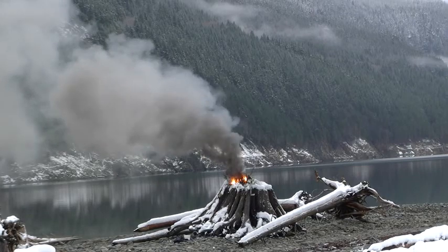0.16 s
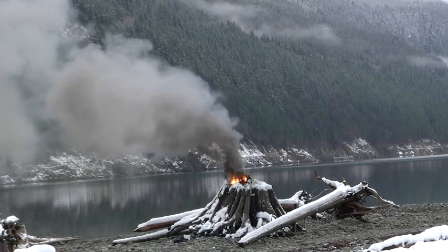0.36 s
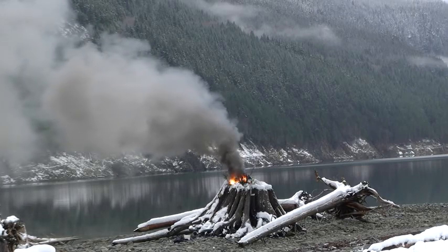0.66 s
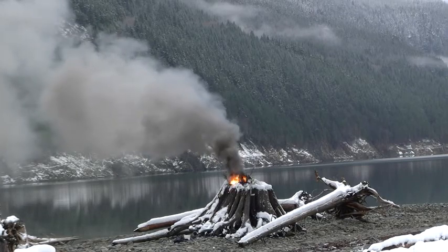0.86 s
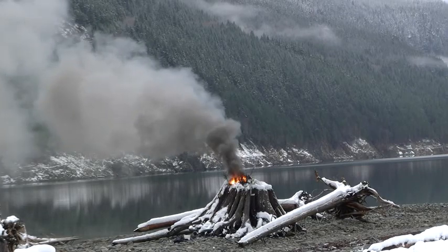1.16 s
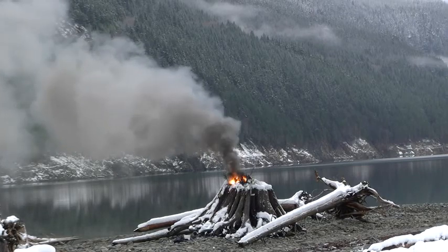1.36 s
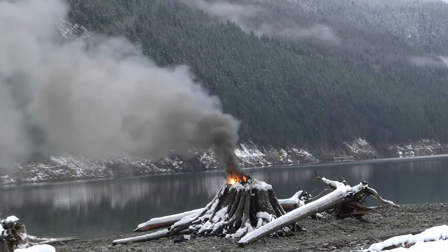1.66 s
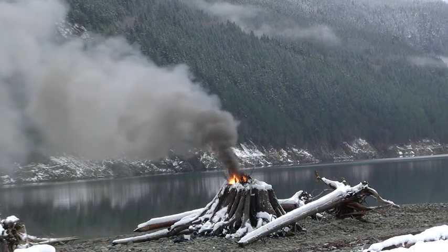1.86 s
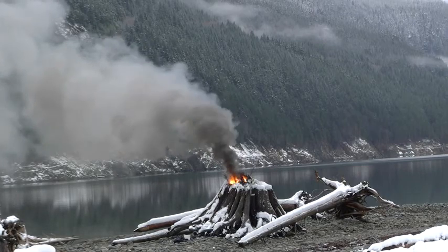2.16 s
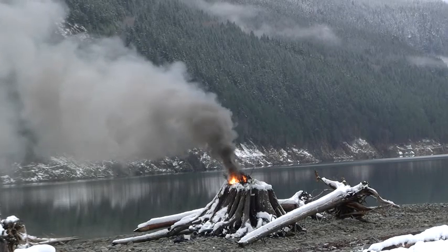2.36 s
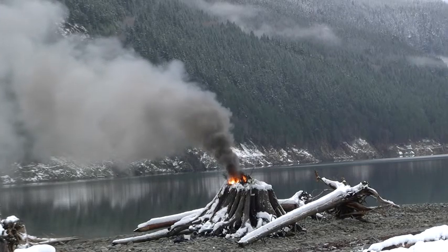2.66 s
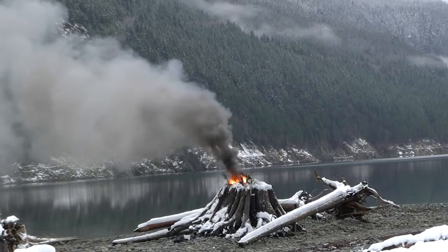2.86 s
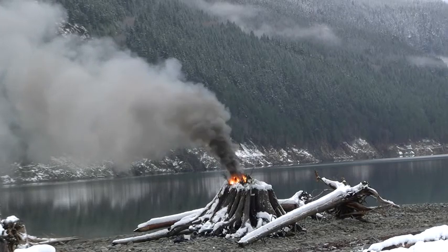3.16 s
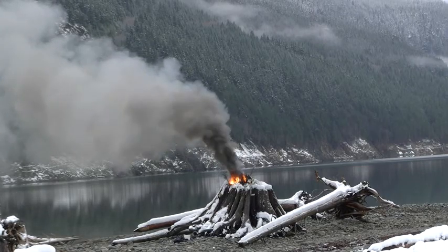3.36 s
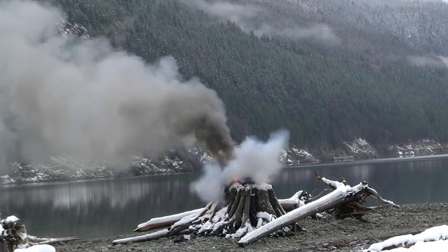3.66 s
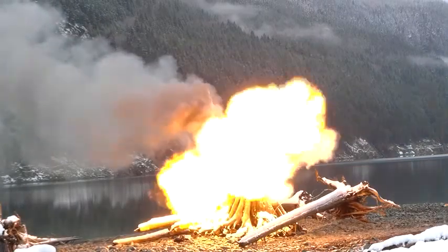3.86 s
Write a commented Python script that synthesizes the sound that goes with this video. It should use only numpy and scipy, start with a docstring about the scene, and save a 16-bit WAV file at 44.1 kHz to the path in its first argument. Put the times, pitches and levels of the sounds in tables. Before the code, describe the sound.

A sudden loud explosion with a short echo interrupts faint fire crackle and distant wind.

```python
"""On the shore of a mountain lake, a stereo microphone faces a burning tree stump. The wood hisses and
pops over the steady rush of the valley, and soft puffs of wind touch the microphone. Then a charge
in the stump goes off with a bright crack and a short roar; the crack's reflection off the ground follows
hard behind. The shock front overloads the microphone, splinters fly, and the fireball swells with a
deep rumble while the shore and the slopes farther off throw the bang back."""
import sys
import numpy as np
from scipy import signal
from scipy.fft import rfft, irfft
from scipy.io import wavfile
from scipy.ndimage import uniform_filter1d

SR = 44100
rng = np.random.default_rng(int(sys.argv[2]) if len(sys.argv) > 2 else 0)


def int16_out(signal):
    """Quantize to a 16-bit WAV file."""
    q = np.round(np.clip(np.atleast_2d(signal).T, -1, 1) * 32767)
    wavfile.write(sys.argv[1], SR, q.astype(np.int16))


N = 176400
T = np.arange(N) / SR

# Microphone resonances struck by the shock. Each row: pitch in Hz, level in dB, decay in seconds.
MIC_MODES = [(1600, 8.5, .00065), (2500, 11, .00058), (6800, 2, .0005)]

# Bursts of noise at the microphone.
# Each row: start in seconds, level in dB, then attack, hold and decay in seconds.
CRACK_BURSTS = [(3.7688, -20, .0004, .013, .009), (3.7868, -16, .0006, .003, .004)]
SPLINTER_BURSTS = [(3.7688, -17, .0002, .001, .002), (3.7866, -17, .0004, .0018, .0016),
                   (3.79, -43.5, .005, .03, .4)]
RUMBLE_BURSTS = [(3.81, -31, .01, .18, .1), (3.894, -19, .013, .058, .011)]
SHORE_BURSTS = [(3.795, -31.5, .004, .012, .033), (3.835, -28.3, .008, .025, .105),
                (3.90, -33.5, .01, .035, .015)]
PUFF_BURSTS = [(.66, -62, .02, .02, .03), (.725, -54, .015, .02, .015), (1.225, -57, .015, .015, .02),
               (2.90, -64, .015, .02, .02)]
ROAR_BURST = (3.7745, -13, .001, .018, .008)
THUMP_BURST = (3.791, -15, .003, .008, .0075)
SLOPE_BURST = (3.981, -28.8, .012, .03, .1)

# The rise and fall of the fire's sizzle. Each row: time in seconds, gain in dB.
FIRE_GAIN = [(0, -63), (.19, -61), (.27, -64.5), (.8, -63.7), (.9, -60.7), (.95, -64.5), (1.4, -62.5),
             (1.6, -63.7), (1.72, -60.7), (2.0, -60.5), (2.38, -59.7), (2.5, -61.7), (2.68, -60.5),
             (2.8, -62.3), (3.0, -61.6), (3.3, -63.5), (3.56, -62.8), (3.72, -64.5)]
# Louder pops of the burning wood. Each row: start in seconds, level in dB, pitch in Hz.
WOOD_POPS = [(.7385, -45, 8000), (1.0985, -48, 3200), (1.383, -48.5, 5000), (1.6645, -50, 4200),
             (1.734, -50, 6500), (2.0045, -49, 3800), (2.3795, -42.3, 4700), (2.7145, -48, 6500),
             (2.858, -46.8, 6400), (2.988, -51, 5000), (3.7378, -50, 4200)]

# The colour of each source at the microphone. Each row: frequency in Hz, relative density in dB.
CRACK_COLOUR = [(100, -8), (300, -6), (700, -7), (1400, 0), (2000, -2), (2500, -2), (3200, -5),
                (4300, -4.5), (6000, -5), (7500, -10), (10500, -11.5), (15000, -20)]
SPLINTER_COLOUR = [(1000, -14), (3000, -2), (4200, 1), (6000, 1), (8000, -3), (10500, -4), (15000, -15)]
ROAR_COLOUR = [(25, -19), (60, -6), (110, -3), (170, 0), (240, 2.5), (295, -5), (355, 3.5), (480, -12),
               (660, -4.5), (900, -9.5), (1300, -8.5), (2500, -23), (6000, -39), (15000, -56)]
THUMP_COLOUR = [(25, -11), (60, -1), (110, 0), (170, 1), (240, -4), (330, -15), (800, -35), (2000, -60)]
RUMBLE_COLOUR = [(20, -18), (35, -6), (52, -5), (72, 1.5), (98, -7), (140, -1.5), (175, -7), (240, -16),
                 (320, -29), (1000, -55), (4000, -85)]
SHORE_COLOUR = [(80, -10), (250, 3), (420, -3), (700, -1.5), (1300, -1.5), (2500, -3.5), (4000, -8.5),
                (7000, -16), (10500, -20.5), (15000, -35)]
SLOPE_COLOUR = [(100, -10), (330, 0), (700, -3), (1300, -7), (3000, -20), (10000, -36)]
FIRE_COLOUR = [(1000, -14), (2500, -1), (3900, 1), (4800, -5), (5800, 1), (7000, -.5), (8000, -4),
               (9500, -3), (12500, -8), (15500, -15)]
PUFF_COLOUR = [(20, -8), (50, 0), (85, -4), (140, -18), (400, -45), (2000, -80)]
VALLEY_COLOUR = [(20, -25), (45, -12), (65, -9), (160, -7.5), (250, -2.5), (450, -.3), (700, -1),
                 (1400, -4.3), (2050, -10), (3000, -15), (4100, -20), (4800, -26), (8000, -30.5),
                 (15000, -38.5)]

# Stereo images of the blast and of the lakeside ambience, both leaning right.
# Each row: frequency in Hz, correlation of the channels, left minus right in dB.
BLAST_STEREO = [(60, .95, -8.5), (170, .9, -9), (380, .68, -5), (700, .6, -3.7), (1400, .55, -2.7),
                (3100, .5, -1.2), (6800, .1, -.7), (15000, -.25, -.7)]
AMBIENT_STEREO = [(60, -.15, -2.5), (130, -.05, -3.5), (300, .58, -3.5), (640, .63, -2), (1400, .52, -2),
                  (3100, .5, -1.5), (6800, .37, -1.8), (15000, .15, -1.5)]


def shock_front(arrival_s=3.7687, right_lag_s=.00005):
    """The shock front rings the microphone far past full scale, left side first."""
    age = np.maximum(T - arrival_s - np.array([[0], [right_lag_s]]), 0)
    return -sum(undb(db) * np.sin(2 * np.pi * hz * age) * np.exp(-np.minimum(age / decay, 20))
                for hz, db, decay in MIC_MODES)


def crack_and_reflection():
    """The charge goes off with a bright crack; its reflection off the ground follows hard behind."""
    return sum(burst(CRACK_COLOUR, BLAST_STEREO, *row) for row in CRACK_BURSTS)


def splinters(grains_per_s=500, grit_db=2.5):
    """Splinters thrown from the stump, heard as gritty spits and a fading spray."""
    grit = unit(undb(grit_db * flicker(grains_per_s)))
    return grit * sum(burst(SPLINTER_COLOUR, BLAST_STEREO, *row) for row in SPLINTER_BURSTS)


def gas_roar(ceiling=.55):
    """Escaping gas roars and ends in a thump, the pressure peaks softly flattened."""
    roar = burst(ROAR_COLOUR, BLAST_STEREO, *ROAR_BURST)
    thump = burst(THUMP_COLOUR, BLAST_STEREO, *THUMP_BURST)
    return ceiling * np.tanh((roar + thump) / ceiling)


def fireball():
    """The swelling fireball sends a deep rumble to the microphone."""
    return sum(burst(RUMBLE_COLOUR, BLAST_STEREO, *row) for row in RUMBLE_BURSTS)


def echoes():
    """The shore scatters the bang back first; the slopes farther off answer later and duller."""
    shore = sum(burst(SHORE_COLOUR, BLAST_STEREO, *row) for row in SHORE_BURSTS)
    return shore + burst(SLOPE_COLOUR, BLAST_STEREO, *SLOPE_BURST)


def fire_sizzle(crackles_per_s=90, spread_db=3.2, decay_s=.0014):
    """The burning stump gives off a wavering hiss, sprinkled with tiny crackles."""
    onsets = rng.random(N) < crackles_per_s / SR
    sparks = onsets * undb(spread_db * np.clip(rng.standard_normal(N), -2, 2))
    tails = signal.lfilter([1], [1, -np.exp(-1 / (decay_s * SR))], sparks + 1e-18)
    crackle = undb(-5) * unit(tails)
    bright_noise = noise(FIRE_COLOUR, AMBIENT_STEREO)
    hiss = undb(.2 + flicker(20))  # wavers by about 1 dB
    strength = undb(np.interp(T, *np.array(FIRE_GAIN).T))
    return strength * bright_noise * np.hypot(crackle, hiss)  # the two envelopes add in power


def wood_pops():
    """The burning wood pops: ticks of noise that fall away on both sides of their pitch."""
    pops = np.zeros((2, N))
    for start, db, hz in WOOD_POPS:
        colour = [(hz / 4, -9), (hz, 0), (hz * 4, -26)]
        pops += burst(colour, AMBIENT_STEREO, start, db, attack=.0002, hold=.0008, decay=.0014)
    return pops


def wind_puffs():
    """Soft, low puffs of wind right on the microphone."""
    return sum(burst(PUFF_COLOUR, AMBIENT_STEREO, *row) for row in PUFF_BURSTS)


def valley_rush(level_db=-45.3, flicker_db=.4):
    """Distant wind and water fill the valley with an even rush."""
    return noise(VALLEY_COLOUR, AMBIENT_STEREO) * undb(level_db + flicker_db * flicker(10))


def undb(db):
    """Decibels to gain."""
    return 10 ** (np.asarray(db) / 20)


def unit(x):
    """Scale to rms 1."""
    return x / np.sqrt(np.mean(x ** 2))


def flicker(per_s):
    """Random steps, per_s of them a second, smoothed twice and scaled to rms 1."""
    width = int(SR / per_s)
    steps = np.repeat(rng.standard_normal(N // width + 1), width)
    return unit(uniform_filter1d(uniform_filter1d(steps, width), width)[:N])


def noise(colour, stereo, size=N):
    """Noise of rms 1 with the given colour and stereo image."""
    log_hz = np.log(np.maximum(np.fft.rfftfreq(size, 1 / SR), 1))

    def curves(table):
        hz, *columns = np.array(table).T
        return [np.interp(log_hz, np.log(hz), column) for column in columns]

    db, = curves(colour)
    correlation, balance_db = curves(stereo)
    mid, side = rfft(rng.standard_normal((2, size)))
    sign = np.array([[1], [-1]])  # left, right
    spectrum = mid * np.sqrt(1 + correlation) + sign * side * np.sqrt(1 - correlation)
    return unit(irfft(spectrum * undb(db + sign * balance_db / 2), size))


def burst(colour, stereo, start, db, attack, hold, decay):
    """Noise that rises, holds at the given level and dies away; times in seconds."""
    size = 16384
    age = np.arange(size) / SR
    envelope = np.clip(age / attack, 0, 1) * np.exp(-np.clip((age - attack - hold) / decay, 0, 20))
    sound = unit(noise(colour, stereo, size) * envelope)
    track = np.zeros((2, N + size))
    at = min(int(start * SR), N)
    track[:, at:at + size] = sound * undb(db) * np.sqrt(np.mean(envelope ** 2))
    return track[:, :N]


def scene():
    """Everything that reaches the microphone on the shore."""
    ambience = valley_rush() + wind_puffs() + fire_sizzle() + wood_pops()
    explosion = shock_front() + crack_and_reflection() + splinters() + gas_roar() + fireball()
    return ambience + explosion + echoes()


def record(dry, clip_level=.93, top_hz=15800):
    """The recorder clips just under full scale, then cuts the highest treble."""
    lowpass = signal.ellip(8, .2, 70, top_hz, fs=SR, output="sos")
    return signal.sosfilt(lowpass, np.clip(dry, -clip_level, clip_level))


dry = scene()
out = record(dry)
int16_out(out)
```